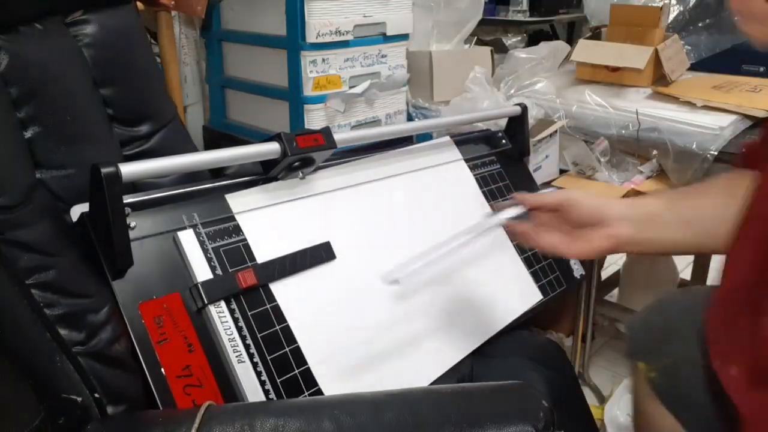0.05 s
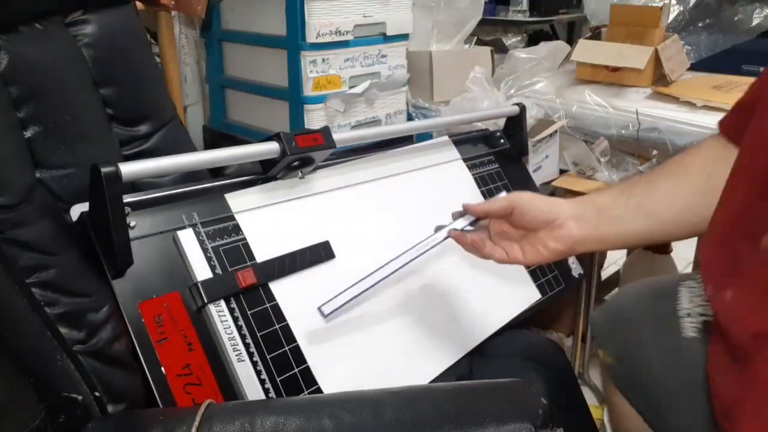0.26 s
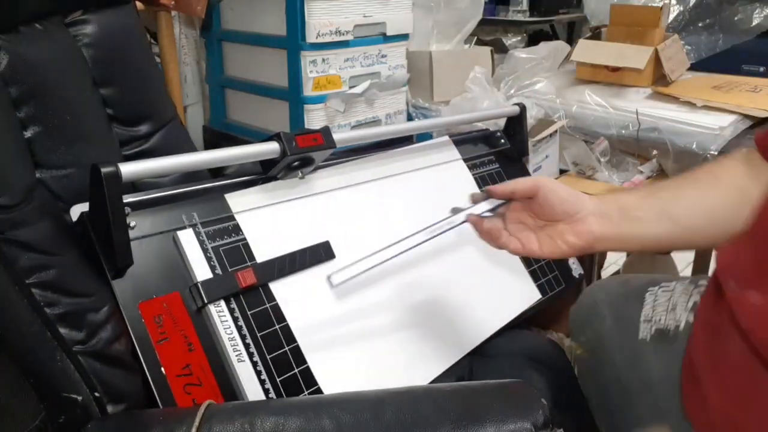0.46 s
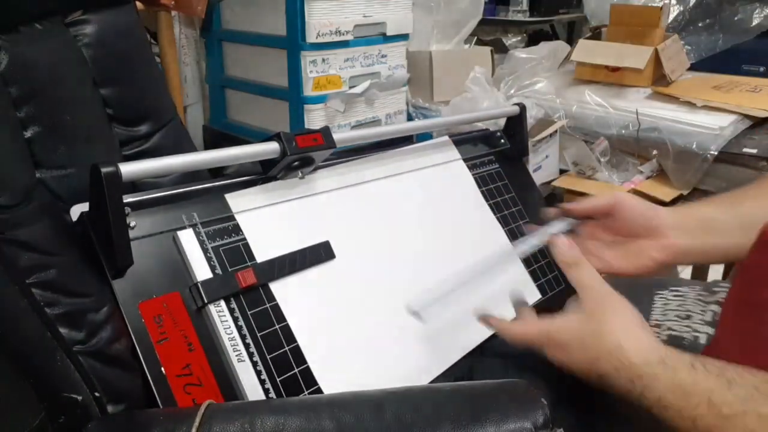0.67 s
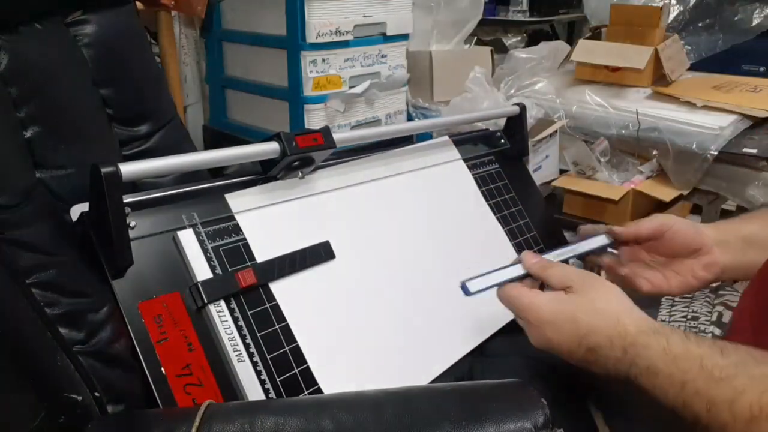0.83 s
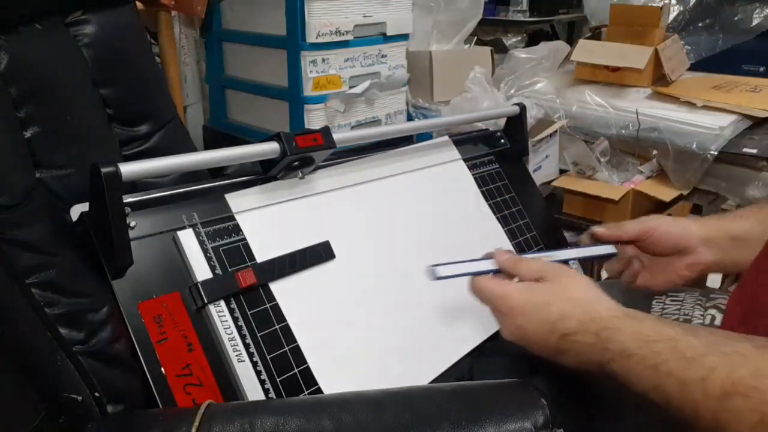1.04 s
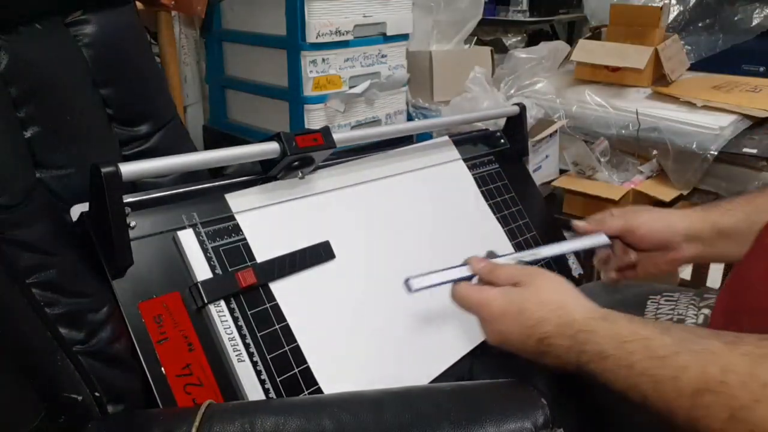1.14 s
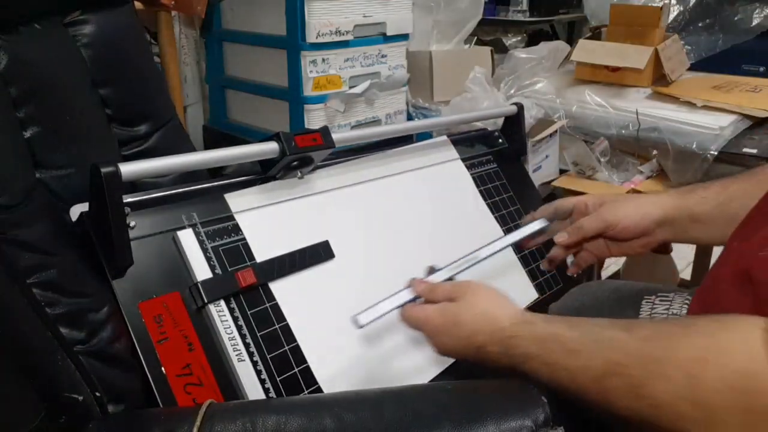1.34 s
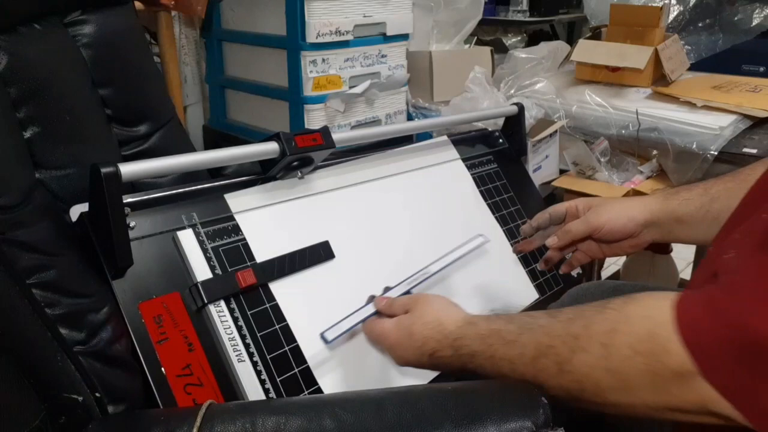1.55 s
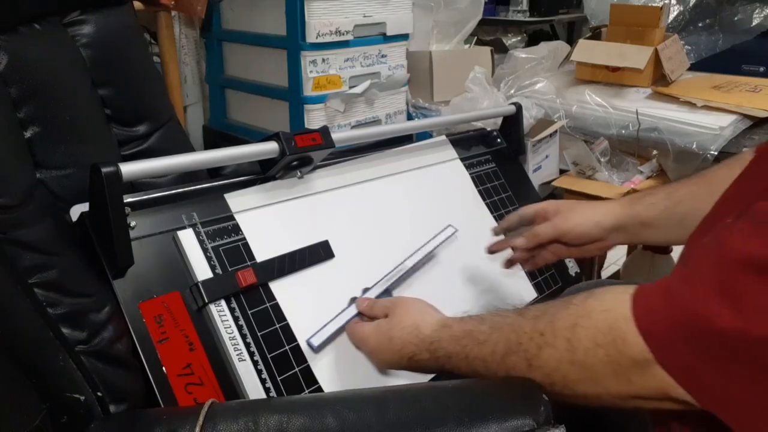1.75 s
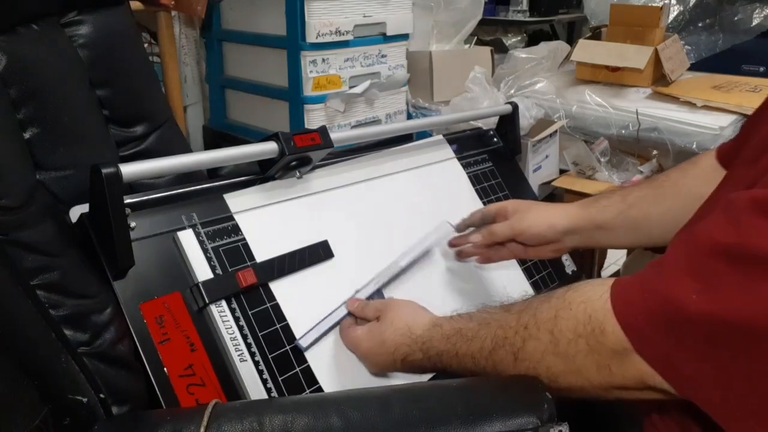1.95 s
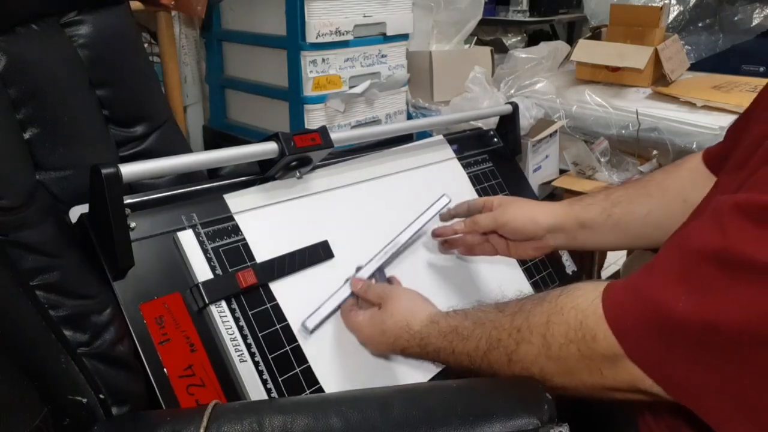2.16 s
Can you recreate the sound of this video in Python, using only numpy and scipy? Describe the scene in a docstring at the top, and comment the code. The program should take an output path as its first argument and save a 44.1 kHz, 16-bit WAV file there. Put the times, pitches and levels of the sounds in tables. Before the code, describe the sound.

A steel ruler strikes a paper trimmer, close up. Around 0.1 s come a dull tap and a sharp click, then a papery skid with a rapid low judder at 0.2-0.35 s. The loudest, hollow knock with brief metallic rattle lands at 0.45 s. Faint finger rubbing lasts until about 1.3 s. After near quiet, light ticks and a tap come at 1.9-2.0 s, then a tiny thin squeak near 2.2 s. Low room hum throughout.

```python
"""Steel ruler on a paper trimmer

A steel ruler touches down on paper, skids and judders across it, and knocks hard on the hollow bed.
Rubbing through the fingers is heard, then it is set down with a light tap and a tiny squeak.
Impacts are damped modes with shaped noise, sliding is grainy noise, and the judder is a train of slips
through resonances. A small, cluttered workroom hums behind it; the microphone is close."""
import sys
import numpy as np
from scipy import signal
from scipy.fft import rfft, irfft, next_fast_len
from scipy.io import wavfile
from scipy.ndimage import map_coordinates

SR = 44100
rng = np.random.default_rng(int(sys.argv[2]) if len(sys.argv) > 2 else 0)


def output_pcm(signal):
    """Save a mono or channel-first signal as 16-bit PCM at the path in sys.argv[1].

    Samples are clipped to [-1, 1] before scaling.
    """
    pcm = np.clip(np.atleast_2d(signal).T, -1, 1) * 32767
    wavfile.write(sys.argv[1], SR, np.round(pcm).astype(np.int16))


N = 97020
T = np.arange(N) / SR  # time of each sample, s
PORT_LAG_S = 0.00008  # arrival at the right port after the left

# modes of the hollow trimmer bed: [f/Hz, relative level/dB, t60/s]
BED_MODES = [(92.2, -17, .42), (131, -13, 0.3), (154, -7.5, 0.27), (210.2, -17.5, 0.32),
             (241.8, -12.5, 0.16), (268, -1, 0.15), (352, -6.5, 0.13), (421, -11.5, .14), (479.4, -13, .12),
             (553, -7, 0.11), (728.6, -19.5, .09), (774.2, -15.5, 0.12), (912, -20, 0.1),
             (1005.6, -14, 0.089), (1108, -22, 0.12), (1340, -24, .15), (1627, -32.5, 0.24)]
# modes of the hand-held ruler: [f/Hz, relative level/dB, t60/s]
RULER_MODES = [(473, 2.5, 0.17), (1238, -13, 0.076), (1834, -4.5, 0.11), (2030, -11, 0.2),
               (2183, -10, 0.18), (2970, -7.5, 0.12), (3200, -14, 0.3), (3385, -5, 0.1474),
               (3666, -4, 0.18), (4860, -3, 0.12), (7214, -22, .16)]
# contacts: [t/s, bed ring level/dB, lowest f excited/Hz, highest f excited/Hz, thud level/dB,
#            ruler ring level/dB, clatter level/dB, crack level/dB, left minus right/dB]
CONTACTS = [(.0905, -26.5, 900, 1207, -37, -72, -61, -59, 2.5),
            (.1294, -17, 780, 883, -39, -64, -40, -19, 2.5), (.357, -24.5, 90, 270, -47, -74, -57, -66, 1),
            (.4462, -5, 70, 2500, -17.5, -31.5, -25.5, -10, 0.9),
            (1.748, -47, 600, 1000, -67, -70, -72, -72, 2),
            (1.956, -50, 400, 1500, -55, -62.5, -60, -57, -2),
            (2.0128, -43, 282, 1410, -46, -43, -41.5, -32.5, -1)]
# colour of the dense, unresolved bed ringing: [f/Hz, relative level/dB]
THUD_COLOUR = [(40, -37), (100, -12.5), (300, 0.5), (600, -3), (1100, -6.5), (1600, -12.5), (2500, -27.5),
               (6000, -55.5)]
# colour of the trimmer's loose parts: [f/Hz, relative level/dB]
CLATTER_COLOUR = [(300, -42), (1200, 9), (2000, 9.5), (3000, 9.5), (5000, 4), (7000, 1), (8500, -13.5),
                  (15000, -42)]
BED_ATTACK_S, THUD_T60_S = 0.001, 0.21
CLATTER_ATTACK_S, CLATTER_T60_S = 0.0036, 0.24


def knocks():
    """Impact excitation: each contact cracks, rings bed and ruler, and shakes the trimmer's loose parts."""
    out = np.zeros((2, N))
    for start, bed_db, low_hz, high_hz, thud_db, ruler_db, clatter_db, crack_db, left_db in CONTACTS:
        t = np.maximum(T - start, 0)
        bed = ring(BED_MODES, start, BED_ATTACK_S, low_hz, high_hz, vary_db=2.8)
        ruler = ring(RULER_MODES, start, attack=0.00058, low_hz=197.3, high_hz=9000, vary_db=1.5)
        thud = unit(filtered(noise(THUD_COLOUR), lambda hz: np.sqrt(reach(hz, low_hz, high_hz))))
        thud = struck(t, THUD_T60_S, BED_ATTACK_S) * thud
        clatter = struck(t, CLATTER_T60_S, CLATTER_ATTACK_S) * noise(CLATTER_COLOUR)
        contact = amp(bed_db) * bed + amp(ruler_db) * ruler + amp(thud_db) * thud
        contact += amp(clatter_db) * clatter + amp(crack_db) * crack(start)
        out += pan(left_db) * contact
    return out


def ring(modes, start, attack, low_hz, high_hz, vary_db):
    """Modal superposition: damped sines of alternating sign, weighted by the contact's band."""
    out = np.zeros((2, N))
    first = int(start * SR)
    span = slice(first, first + SR // 2)
    t = np.maximum(T[span] - start - np.array([[0], [PORT_LAG_S]]), 0)
    for k, (hz, db, t60) in enumerate(modes):
        level_db = db + vary_db * rng.standard_normal()
        gain = (-1) ** k * reach(hz, low_hz, high_hz) * amp(level_db)
        out[:, span] += gain * struck(t, t60, attack) * np.sin(2 * np.pi * hz * t)
    return out


def reach(hz, low_hz, high_hz):
    """Band-limited excitation: a contact drives modes outside its band ever more weakly."""
    below = 1 + (low_hz / (hz + 1)) ** 6
    above = 1 + (hz / high_hz) ** 6
    return 1 / np.sqrt(below * above)


def struck(t, t60, attack):
    """Exponential decay after a smooth onset, t seconds from contact."""
    return amp(-60 * t / t60) * (1 - np.exp(-t / attack))


# colour of the hard contact itself: [f/Hz, relative level/dB]
CRACK_COLOUR = [(300, -19), (2000, -11), (3000, 18.5), (5000, 4), (7000, -0.5), (10000, -6), (15000, -19.5)]
SPLINTER_T60_S, SPLINTER_DB = 0.018, -5  # level relative to the click's peak scale


def crack(start):
    """Impulse response of hard contact: one sharp click and a few ms of splintering noise."""
    delay = start + np.array([[0], [PORT_LAG_S]])

    def response(hz):
        return amp(along(CRACK_COLOUR, hz)) * np.exp(-2j * np.pi * hz * delay)

    click = filtered(np.eye(1, N)[0], response)
    click = click / np.abs(click).max()
    decay = struck(np.maximum(T - start, 0), SPLINTER_T60_S, attack=0.0001)
    return click + amp(SPLINTER_DB) * decay * noise(CRACK_COLOUR)


# resonances of the ruler bent against the bed: [f/Hz, bandwidth/Hz, relative level/dB]
BENT_RULER = [(180, 24, 1), (214.6, 16, 5), (380, 34, 0.5), (575, 41, 4), (800, 22, 0), (968, 80, -7.5),
              (1445, 130, -12.5), (1668, 44.4, -18)]
JUDDER_S, JUDDER_RISE_S, JUDDER_HOLD_S, JUDDER_FALL_S = 0.205, 0.026, 0.016, 0.17  # fall is by 60 dB
SLIP_HZ, SLIP_SCATTER, SLIP_COUNT = 196.3, 0.2, 40  # mean rate, timing scatter in slip periods
JUDDER_DB = -21.5
RASP_DB, SHAKE_DB = -14.5, -6.5  # relative to the judder's tone


def judder():
    """Stick-slip: uneven slips of the tip drive the bent ruler's resonances and rasp on the paper."""
    scatter = SLIP_SCATTER * rng.standard_normal(SLIP_COUNT)
    when = JUDDER_S + (np.arange(SLIP_COUNT) + scatter) / SLIP_HZ
    strength = judder_force(when) * amp(1.5 * rng.standard_normal(SLIP_COUNT))
    slips = np.bincount((when * SR).astype(int), strength, N)
    lag = np.array([[0], [PORT_LAG_S]])
    tone = filtered(slips, lambda hz: bent_response(hz) * np.exp(-2j * np.pi * hz * lag))
    force = judder_force(T)
    tone = unit(tone) * np.sqrt(np.mean(force ** 2))
    rasp = amp(RASP_DB) * noise(CLATTER_COLOUR)
    shake = amp(SHAKE_DB) * noise(THUD_COLOUR)
    return amp(JUDDER_DB) * (tone + force * (rasp + shake))


def judder_force(s):
    """Force envelope: a squared rise, a hold and an exponential release."""
    rise = np.clip((s - JUDDER_S) / JUDDER_RISE_S, 0, 1) ** 2
    falling = np.maximum(s - JUDDER_S - JUDDER_RISE_S - JUDDER_HOLD_S, 0)
    return rise * amp(-60 * falling / JUDDER_FALL_S)


def bent_response(hz):
    """Forced resonance: a sum of second-order resonators of alternating sign."""
    total = 0
    for k, (centre, width, db) in enumerate(BENT_RULER):
        damping = 1j * hz * width
        total = total + (-1) ** k * amp(db) * damping / (centre ** 2 - hz ** 2 + damping)
    return total


# the skid over the paper: [t/s, level/dB]
SKID_LEVEL = [(.07, -71), (.097, -47.5), (.126, -49.5), (.145, -36), (.19, -40), (.215, -34), (.26, -37.5),
              (.31, -36), (.36, -33.5), (.405, -40), (.47, -35), (.53, -50.5), (.565, -47.5), (.6, -70)]
# colour of steel on paper: [f/Hz, relative level/dB]
PAPER_COLOUR = [(240, -5), (400, -16.5), (552, 2.5), (663, -18.5), (784, -7.5), (1760, -12.5), (2880, -4),
                (5390, -7.5), (6990, -4), (8030, -10.5), (15500, -11.5)]


def skid():
    """Sliding friction of steel on paper."""
    return friction(SKID_LEVEL, PAPER_COLOUR, grain_db=1.25, grain_hz=489.5)


def friction(curve, spectrum, grain_db, grain_hz):
    """Friction noise: many slips merge into coloured noise, clumped by the grain of the surface."""
    grain = amp(grain_db * wobble(grain_hz))
    return level(curve) * unit(noise(spectrum) * grain)


# steel sliding through the fingers: [t/s, level/dB]
RUB_LEVEL = [(0, -50), (.07, -57), (.55, -53.5), (.68, -50.5), (.77, -50), (.83, -51), (.9, -49),
             (.99, -51.5), (1.05, -57.5), (1.1, -57.5), (1.155, -53), (1.22, -62.5), (1.27, -60),
             (1.38, -74), (1.7, -73.5), (1.93, -61.5), (2.05, -61.5), (2.2, -72.5)]
# colour of steel on skin: [f/Hz, relative level/dB]
SKIN_COLOUR = [(290, -13), (500, 2.5), (648, -8.5), (726, -1.5), (1130, -7), (1270, -2), (2040, -3),
               (2330, -4), (5050, -2), (15500, -17)]


def rub():
    """Sliding friction of steel through the fingers."""
    return friction(RUB_LEVEL, SKIN_COLOUR, grain_db=0.95, grain_hz=252)


# the ruler's edge ticks lightly as it is shifted: [t/s, level/dB]
TICK_TIMES = [(.077, -51), (0.0949, -41), (1.9065, -51), (1.9288, -52), (1.9572, -47.5), (2.0136, -37)]
# colour of a tick: [f/Hz, relative level/dB]
TICK_COLOUR = [(1500, -19.5), (4000, -1.5), (6500, 1.5), (8500, -9.5), (15000, -19.5)]
TICK_T60_S = 0.029


def ticks():
    """Light impact: tiny bright noise bursts that leave the bed at rest."""
    envelope = np.zeros(N)
    for start, db in TICK_TIMES:
        envelope += amp(db) * struck(np.maximum(T - start, 0), TICK_T60_S, attack=0.00022)
    return noise(TICK_COLOUR) * envelope


SQUEAK_S, SQUEAK_RISE_S, SQUEAK_T60_S, SQUEAK_HZ, SQUEAK_DB = 2.168, 0.0073, 0.095, 5283, -49  # peak level


def squeak():
    """Frequency-modulated tone: one brief, thin squeak of steel as the ruler is nudged into place."""
    phase = 2 * np.pi * np.cumsum(SQUEAK_HZ * (1 + 0.0046 * wobble(397))) / SR
    t = T - SQUEAK_S
    rise = np.clip(t / SQUEAK_RISE_S, 0, 1)
    decay = amp(-60 * np.maximum(t - SQUEAK_RISE_S, 0) / SQUEAK_T60_S)
    return amp(SQUEAK_DB) * rise * decay * np.sin(phase)


# decay of the workroom: [f/Hz, t60/s]
ROOM_T60 = [(100, 0.45), (500, 0.22), (3000, 0.43), (10000, 0.11)]


def room(x):
    """Diffuse reverberation: convolution with noise that decays at its own rate in each band."""
    hz, t, bins = signal.stft(rng.standard_normal((2, N)), SR, nperseg=256)
    decay = amp(-60 * t / along(ROOM_T60, hz)[:, None])
    tail = signal.istft(bins * decay, SR, nperseg=256)[1][:, :N]
    onset = np.minimum(T / 0.0027, 1)
    # colour of the tail: f/Hz, relative level/dB
    tail = spread(tail * onset, [(150, -10), (700, 5), (4000, -5.5), (15000, -7.5)])
    return signal.fftconvolve(x, tail / np.linalg.norm(tail[0]), axes=1)[:, :N]


# colour of the room air: [f/Hz, relative level/dB]
AIR_COLOUR = [(20, -41), (33, -29.5), (45, -7.5), (62, -8.5), (95, -1), (170, -5), (280, -8), (469, -11),
              (722, -20.5), (1170, -20), (2850, -29.5), (5000, -31.5), (8100, -55), (15500, -49.5)]
# hums that come and go in the room: [f/Hz, rms level/dB, start t/s, end t/s]
ROOM_HUMS = [(43.4, -63, -.5, 1.56), (171, -56.5, 1.607, 2.8), (223.7, -63.5, -0.15, 3.1),
             (308, -64, 0.32, 1), (346, -57, .68, 1.314)]
AIR_DB, HUM_FADE_S = -55, 0.07


def background():
    """Stationary noise and wavering tones: room air and a few low hums."""
    out = amp(AIR_DB) * noise(AIR_COLOUR)
    for hz, db, start, end in ROOM_HUMS:
        phase = 2 * np.pi * np.cumsum(hz * (1 + 0.0036 * wobble(15))) / SR
        swell = (np.tanh((T - start) / HUM_FADE_S) - np.tanh((T - end) / HUM_FADE_S)) / 2
        out = out + amp(db) * np.sqrt(2) * swell * np.sin(phase)
    return out


# likeness of left and right in diffuse sound: [f/Hz, correlation]
LIKENESS = [(60, 1), (300, 0.56), (600, 0.55), (1100, -0.32), (2000, -0.024), (15000, -0.074)]


def spread(pair, spectrum):
    """Interchannel coherence: two unrelated signals become a coloured stereo pair, most alike in the bass."""
    def response(hz):
        angle = np.arccos(np.clip(along(LIKENESS, hz), -1, 1)) / 2
        return amp(along(spectrum, hz)) * np.array([np.cos(angle), np.sin(angle)])

    mid, side = filtered(pair, response)
    return unit(np.array([mid + side, mid - side]))


def noise(spectrum):
    """Spectral shaping: coloured stereo noise of rms 1."""
    return spread(rng.standard_normal((2, N)), spectrum)


def filtered(x, response):
    """Linear filtering: the spectrum of x times a complex response of frequency."""
    m = next_fast_len(N + SR // 2)
    return irfft(rfft(x, m) * response(np.fft.rfftfreq(m, 1 / SR)), m)[..., :N]


def wobble(rate):
    """Random modulation: a smooth curve through random knots, rate knots a second."""
    return map_coordinates(rng.standard_normal(2048), [T * rate], mode="wrap")


def pan(left_db):
    """Level difference between the two ports, shared equally."""
    return amp(np.array([[left_db], [-left_db]]) / 2)


def level(rows):
    """Level envelope: gain per sample of a (t/s, level/dB) curve."""
    return amp(np.interp(T, *np.transpose(rows)))


def along(points, hz):
    """Logarithmic frequency scale: (f/Hz, value) points interpolated on it."""
    f, v = np.transpose(points)
    return np.interp(np.log(hz + 1), np.log(f + 1), v)


def unit(x):
    """Normalisation to rms 1."""
    return x / np.sqrt(np.mean(x ** 2) + 1e-20)


def amp(db):
    """Decibel law: amplitude gain of a level in dB."""
    return 10 ** (np.asarray(db) / 20)


SKID_LEFT_DB, JUDDER_LEFT_DB, RUB_LEFT_DB, BACKGROUND_LEFT_DB = 1.2, 1.8, -0.25, -3  # left minus right
ROOM_DB = -18.5  # reverberation relative to the direct sound


def scene():
    """Superposition: ruler and trimmer close by, their reverberation and the background."""
    near = knocks() + pan(JUDDER_LEFT_DB) * judder()
    near += pan(SKID_LEFT_DB) * skid() + pan(RUB_LEFT_DB) * rub()
    near += ticks() + squeak()
    return near + amp(ROOM_DB) * room(near) + pan(BACKGROUND_LEFT_DB) * background()


TOP_HZ = 15800


def record(dry):
    """Saturation and band limit: peaks near full scale are rounded, nothing passes above TOP_HZ."""
    held = dry / (1 + np.abs(dry) ** 8) ** (1 / 8)
    return filtered(held, lambda hz: hz < TOP_HZ)


dry = scene()
out = record(dry)
output_pcm(out)
```